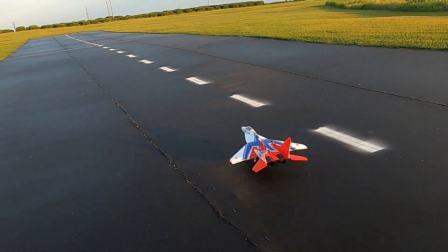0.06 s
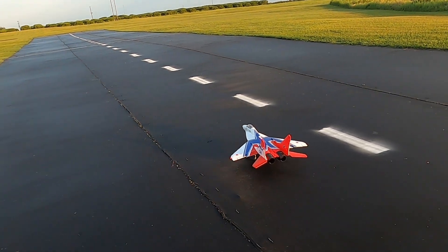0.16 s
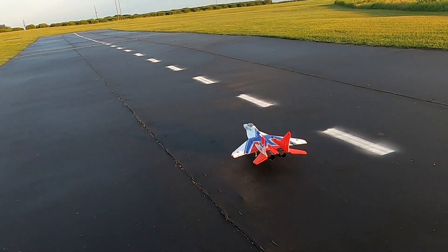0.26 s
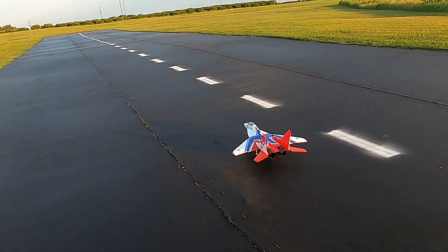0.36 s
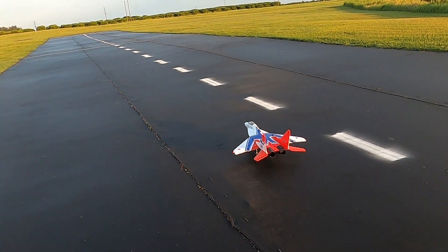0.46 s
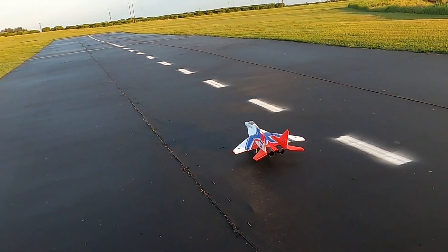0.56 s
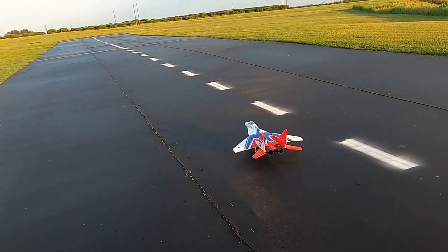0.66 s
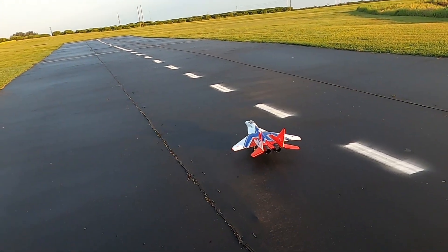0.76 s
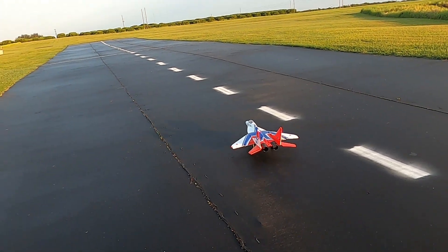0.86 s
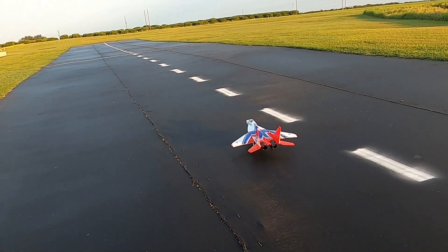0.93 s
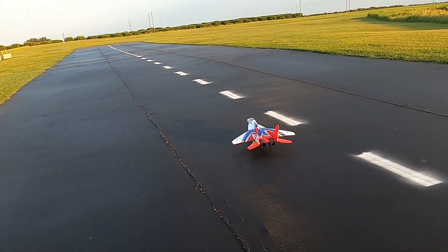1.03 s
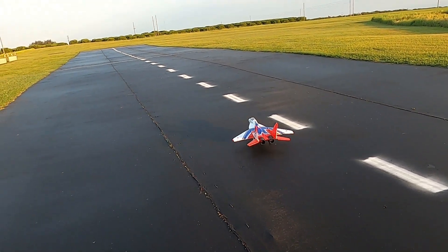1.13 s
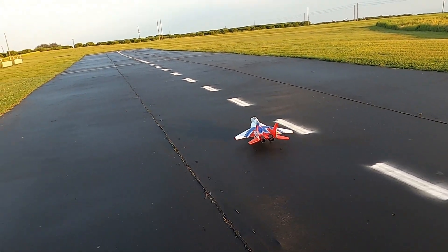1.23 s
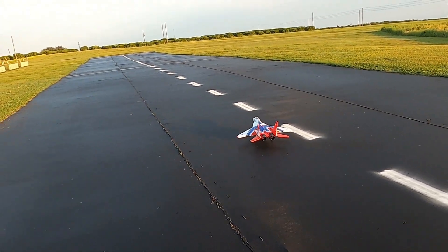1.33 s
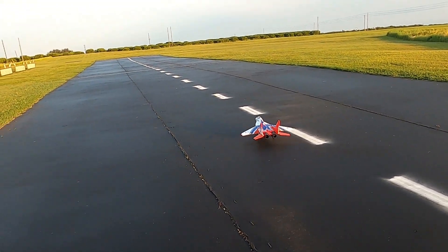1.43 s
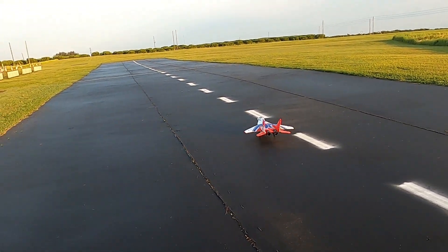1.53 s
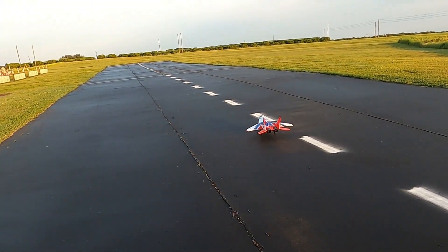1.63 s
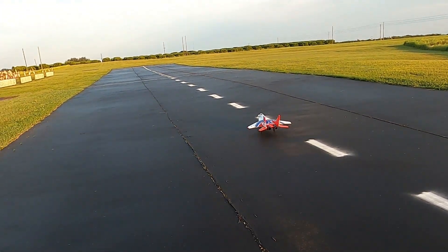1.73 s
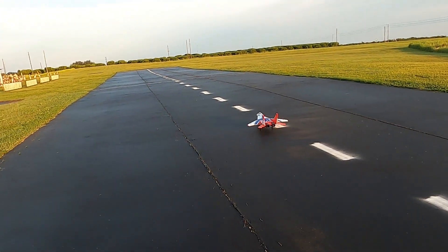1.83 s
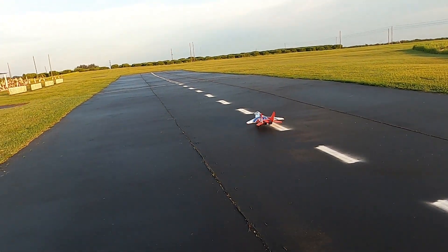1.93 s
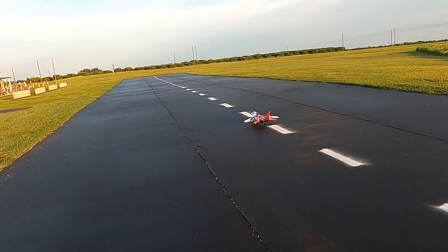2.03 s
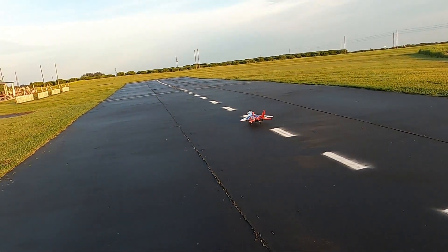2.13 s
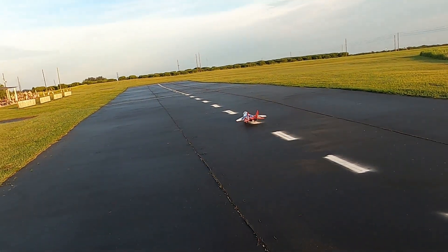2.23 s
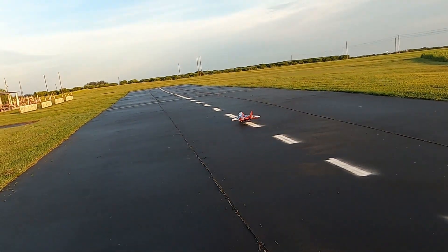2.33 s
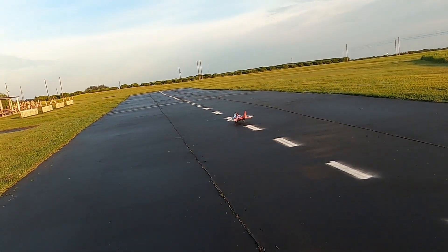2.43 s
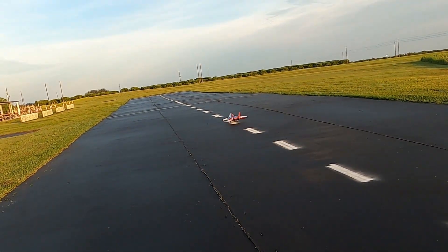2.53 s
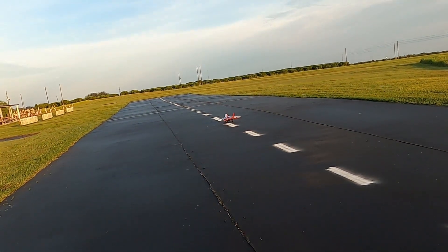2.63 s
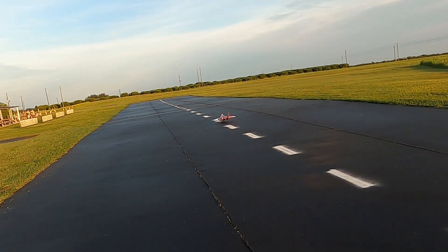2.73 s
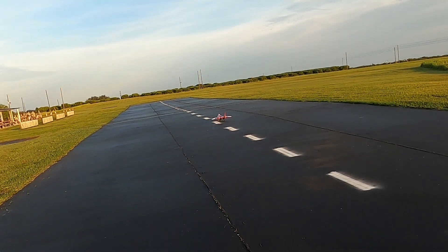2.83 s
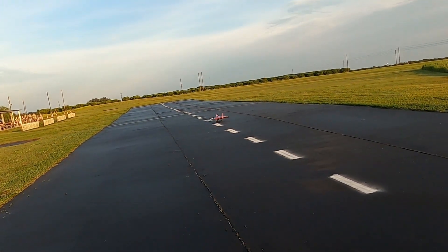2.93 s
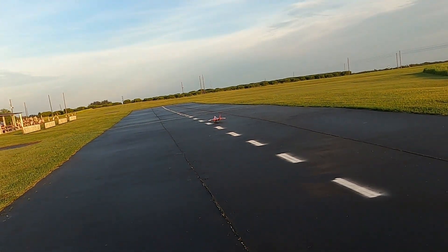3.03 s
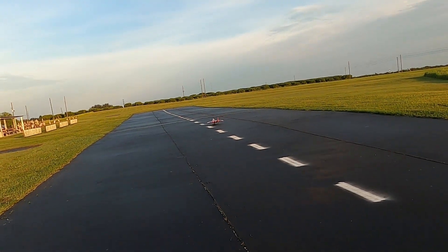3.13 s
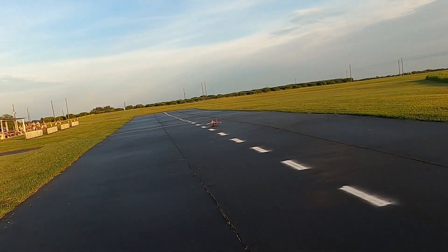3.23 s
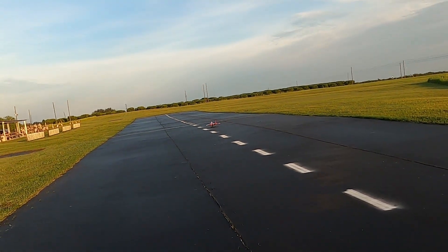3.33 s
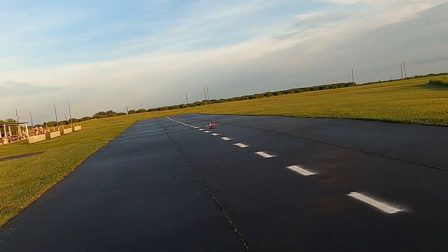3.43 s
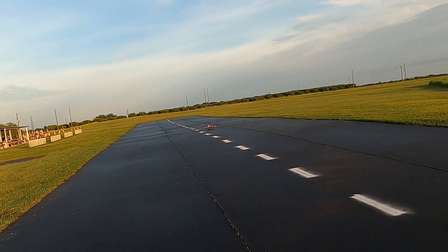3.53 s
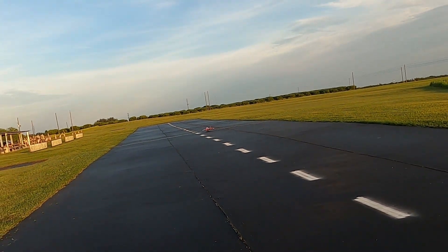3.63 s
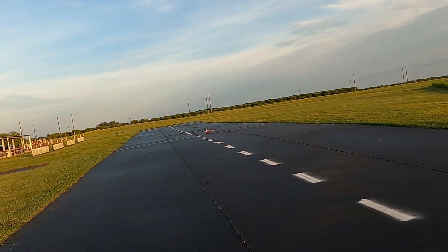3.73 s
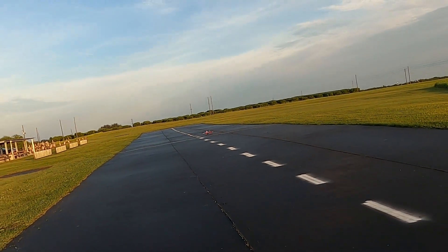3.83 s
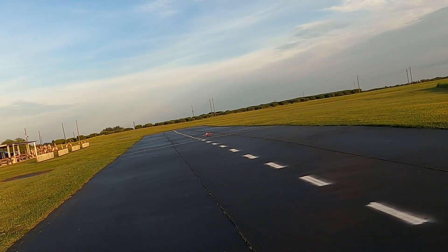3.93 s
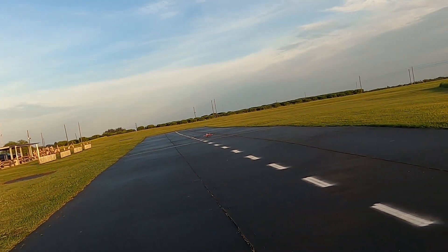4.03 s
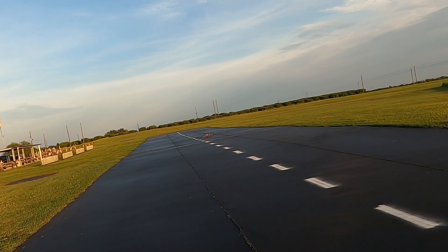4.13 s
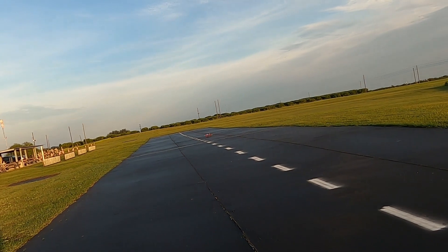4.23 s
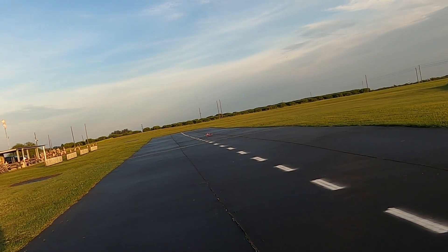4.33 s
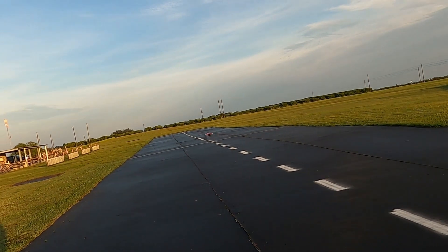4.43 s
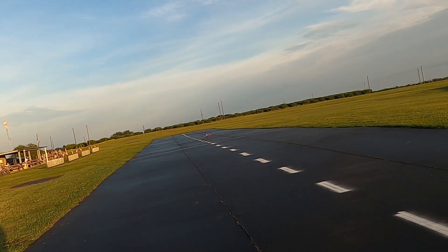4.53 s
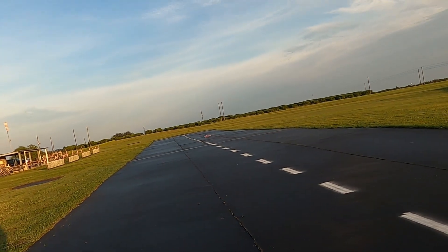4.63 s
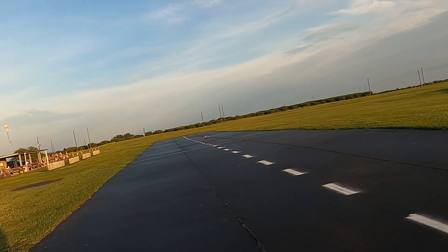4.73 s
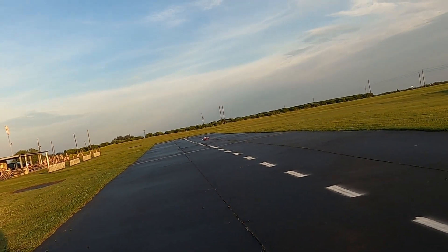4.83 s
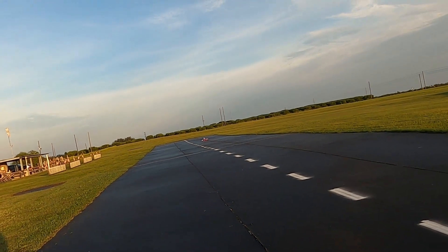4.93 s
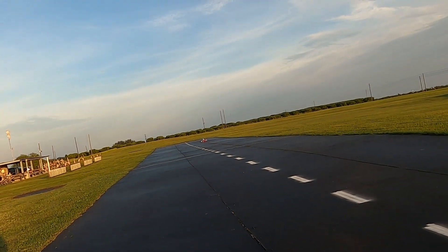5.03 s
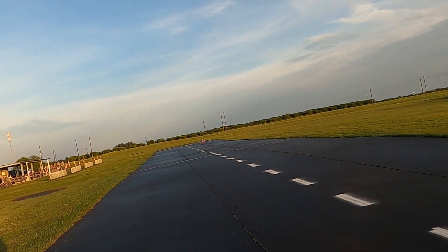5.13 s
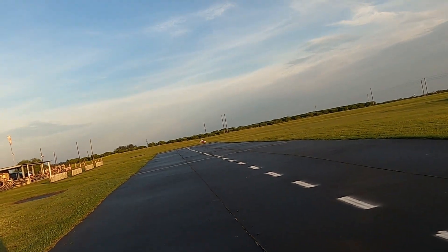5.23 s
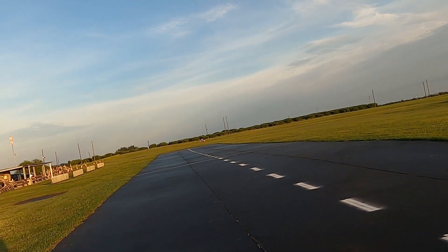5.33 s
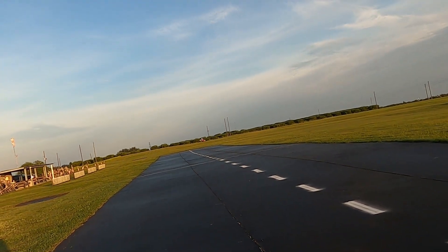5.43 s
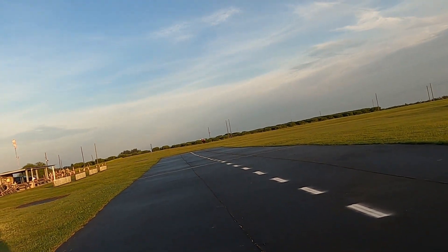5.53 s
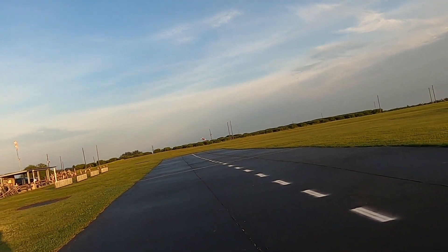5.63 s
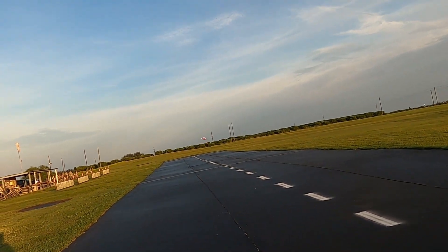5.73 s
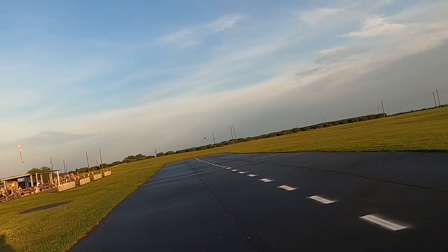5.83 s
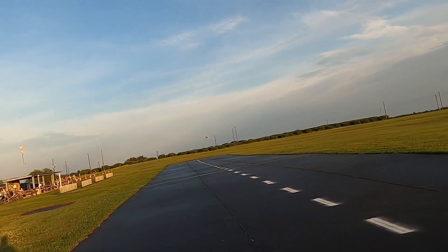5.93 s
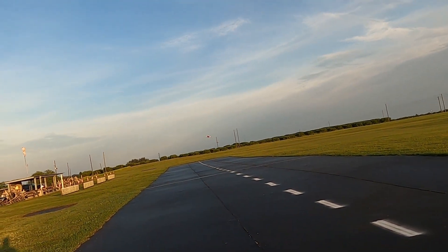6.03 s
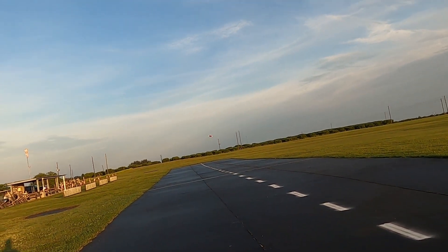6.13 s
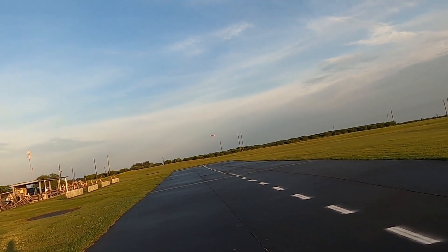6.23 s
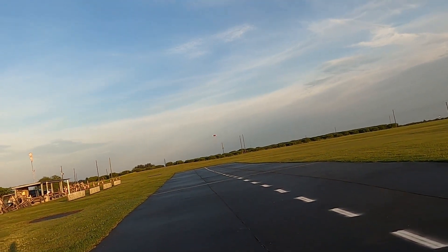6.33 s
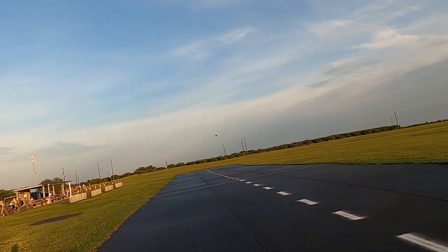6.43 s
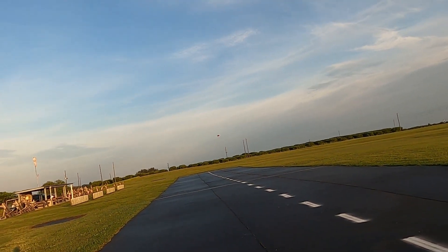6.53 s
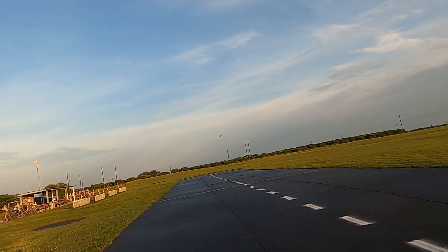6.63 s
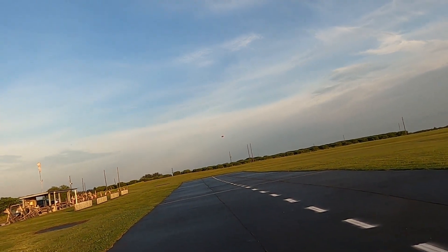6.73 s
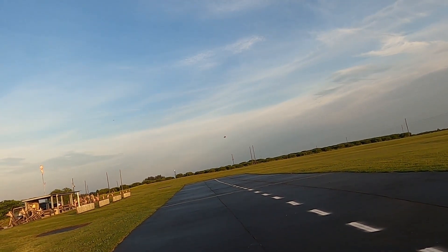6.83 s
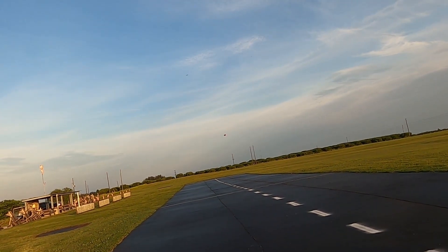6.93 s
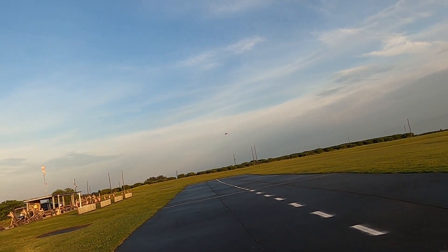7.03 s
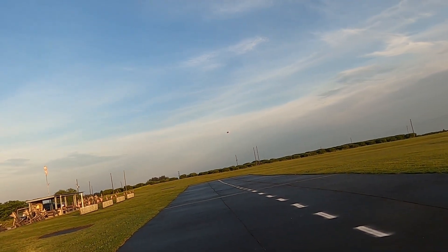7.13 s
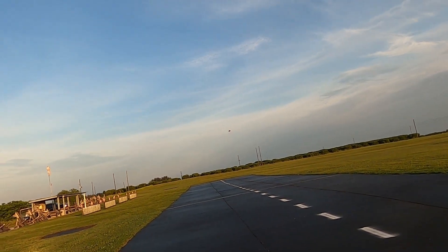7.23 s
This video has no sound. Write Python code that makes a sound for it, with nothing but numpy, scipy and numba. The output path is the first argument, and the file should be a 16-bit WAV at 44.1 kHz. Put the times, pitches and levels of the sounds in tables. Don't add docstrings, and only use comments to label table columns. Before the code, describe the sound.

From the start a model jet's twin electric fans blow loudly nearby on an open runway: a broad, rough exhaust rush with a piercing whine around 4.5 kHz and slight hollow duct howls. The roar dips around 0.4 s, then surges near 0.8 s as the whine climbs in steps, reaching over 8 kHz by 2 s, wavering as the two fans beat. From 2.3 s the jet recedes; treble thins, the whine weakens and the roar drops steadily through 4.5 s. Two very light plastic ticks fall at 3.85 s, and a faint rising bird chirp at 4.7 s. Around 5.2 s the distant whine and airy hiss briefly re-emerge as it lifts off, a phasing comb sliding downward through the fading roar. Soft distant hum and light low wind gusts stay beneath. A sharp, close plastic switch click strikes at 6.94 s, before the faint tail ends at about 7.3 s.

```python
import sys
import numpy as np
from scipy import signal
from scipy.fft import rfft, irfft, next_fast_len
from scipy.io import wavfile
from scipy.ndimage import uniform_filter1d, map_coordinates
from numba import njit

SR = 44100
rng = np.random.default_rng(int(sys.argv[2]) if len(sys.argv) > 2 else 0)


def convert_level_to_amplitude(level_db):
    exponent = np.asarray(level_db, float) / 20
    return 10 ** exponent


def pcm_store(signal):
    levels = np.round(np.clip(np.atleast_2d(signal), -1, 1) * 32767)
    wavfile.write(sys.argv[1], SR, levels.astype(np.int16).T)


N = 321092
T = np.arange(N) / SR
PADDED = next_fast_len(N)
BIN_HZ = np.arange(PADDED // 2 + 1) * SR / PADDED

# (time [s], roar level [dB], clear view of the nozzles [0-1])
JET = [(0, -22.5, 0.84), (.32, -25.5, 0.93), (.48, -26.5, 0.95), (.78, -20, 0.75), (.95, -21.5, 0.92),
       (1.12, -22, 0.89), (1.3, -22, 0.84), (1.5, -22.5, 0.77), (1.66, -22.5, 0.85), (1.8, -22.5, 0.85),
       (2.25, -23.5, 0.77), (2.6, -23.5, 0.38), (3.04, -26, 0.27), (3.15, -26.5, 0.4), (3.2, -27, .12),
       (3.36, -28.5, 0), (3.6, -30, 0.35), (4, -33, 0.22), (4.3, -34, 0.26), (4.5, -33.5, 0),
       (4.8, -36.5, 0.2), (4.88, -36.5, 0.63), (5.12, -37, 0.74), (5.28, -36, 1), (5.42, -36.5, 0.89),
       (5.6, -39, 0.96), (5.95, -41, 0.91), (6.5, -41.5, 0.91), (6.9, -41.5, 0.89), (7.28, -42, 0.87)]
FULL_HZ = 8200
NOZZLE_M, CAMERA_M = .13, 1.7


def curves(table):
    s, *columns = np.transpose(table)
    return [np.interp(T, s, c) for c in columns]


def on_log_hz(table, column=1):
    rows = np.array(table, float)
    return np.interp(np.log(BIN_HZ + 1), np.log(rows[:, 0]), rows[:, column])


def shaped(x, gain):
    return irfft(rfft(x, PADDED) * gain, PADDED)[..., :N]


def above(edge_hz):
    return 1 / (1 + (edge_hz / (BIN_HZ + 1)) ** 8)


def unit(x):
    return x / np.sqrt(np.mean(x ** 2))


def walk(rate):
    k = int(SR / rate)
    steps = np.repeat(rng.standard_normal(N // k + 1), k)
    return unit(uniform_filter1d(uniform_filter1d(steps, k), k)[:N])


def held(events):
    edge_s = 0.056
    return sum(convert_level_to_amplitude(db) * np.clip(np.minimum(T - s, s + length - T) / edge_s, 0, 1)
               for s, length, db in events)


def phase(hz):
    return 2 * np.pi * np.cumsum(hz) / SR


def rippled(x, table, share):
    gain = convert_level_to_amplitude(sum(db / (1 + ((BIN_HZ - hz) / width * 2) ** 2) for hz, width, db in table))
    return x + np.clip(share, 0, 1) * shaped(x, gain - 1)


def echo(x, lag_ms, share, blur_hz, clarity):
    at = np.arange(N) - lag_ms * SR / 1000
    dull = shaped(x, 1 / (1 + (BIN_HZ / blur_hz) ** 2))
    source = dull + clarity * (x - dull)
    return x + share * np.array([map_coordinates(row, [at], order=2) for row in source])


@njit
def band(x, hz, width):
    y, b, l = np.empty(len(x)), 0., 0.
    for i in range(len(x)):
        g, k = np.tan(np.pi * hz[i] / SR), width / hz[i]
        v = (b + g * (x[i] - l)) / (1 + g * (g + k))
        b, l, y[i] = 2 * v - b, l + 2 * g * v, k * v
    return y


def blade_rate():
    # (time [s], blade rate the fans run up to [Hz])
    throttle = [(0, 4690), (.06, 4470), (.21, 4390), (.34, 4355), (.46, 4520), (.5, 4690), (.56, 4850),
                (.6, 5150), (.65, 5380), (.75, 5560), (.85, 5950), (.92, 6300), (.97, 6662), (1.23, 6765),
                (1.49, 7030), (1.63, 7380), (1.68, 7560), (1.745, 7950), (1.8, 8112), (2.06, 8300),
                (2.12, 8485), (5, 8520)]
    stick_s, spool_s = .05, .032
    sag_from_s, recede_hz, recede_s, tire_hz_per_s = 2.3, 300, 1.1, 29
    s, hz = np.transpose(throttle)
    stick = uniform_filter1d(hz[np.searchsorted(s, T, side="right") - 1], int(stick_s * SR))
    keep = np.exp(-1 / (spool_s * SR))
    spooled = hz[0] + signal.lfilter([1 - keep], [1, -keep], stick - hz[0])
    since = np.maximum(T - sag_from_s, 0)
    return spooled - recede_hz * (1 - np.exp(-since / recede_s)) - tire_hz_per_s * since


def flight():
    start_m, push_m_s2, rolling_drag, top_m_s = 5, 20, .3, 28
    lift_s, climb_m_s = 5.37, 9.2
    push = push_m_s2 * np.maximum((blade_rate() / FULL_HZ) ** 2 - rolling_drag, 0)
    speed = np.minimum(np.cumsum(push) / SR, top_m_s)
    metres = start_m + np.cumsum(speed) / SR
    return metres, NOZZLE_M + climb_m_s * np.maximum(T - lift_s, 0)


def exhaust():
    # (frequency [Hz], density [dB per Hz])
    exhaust_colour = [(60, -45), (120, -31), (160, -10.5), (350, 0), (700, -3.5), (1000, 0.5), (1600, 4.5),
                      (2500, 0.5), (4500, -2), (6600, -17.5), (8500, -16), (10500, -16.5), (13500, -22),
                      (15500, -55)]
    # (low edge [Hz], middle edge [Hz], top edge [Hz])
    register_edges = (1677, 3980, 6320)
    # (level when hidden [dB], gain in clear view [dB],
    # how late the gain comes [power], change with fan speed [dB per octave])
    rush_set = (-7.5, 10.5, 3.5, 9.5)
    hiss_set = (-21.5, 15.5, 1.5, -9.5)
    fizz_set = (-21.5, 14, 1.4, 5)
    roar_db, view = curves(JET)
    octaves = np.log2(blade_rate() / FULL_HZ)

    def register_db(hidden_db, clear_db, late, spool_db):
        return hidden_db + np.maximum(view, 0) ** late * clear_db + octaves * spool_db

    air = rng.standard_normal((2, N))
    colour = convert_level_to_amplitude(on_log_hz(exhaust_colour))
    low, mid, top = (above(hz) for hz in register_edges)
    stir = walk(7.9)
    roar = convert_level_to_amplitude(-3.5 + .5 * walk(9)) * unit(shaped(air, colour * (1 - low)))
    rush = convert_level_to_amplitude(register_db(*rush_set) - 3.0 + walk(11)) * unit(shaped(air, colour * (low - mid)))
    hiss = convert_level_to_amplitude(register_db(*hiss_set) - 10.0 + 0.22 * stir) * unit(shaped(air, colour * (mid - top)))
    fizz = convert_level_to_amplitude(register_db(*fizz_set) + 3.5 + .8 * stir) * unit(shaped(air, colour * top))
    return convert_level_to_amplitude(roar_db) * (roar + rush + hiss + fizz)


def fans():
    # (time [s], level [dB])
    whine_levels = [(0, -26), (.07, -26), (.12, -32), (.17, -29), (.2, -37), (.26, -35), (.31, -29),
                    (.38, -29), (.44, -31), (.52, -31), (.59, -26), (.62, -36), (.67, -36), (.73, -28),
                    (.76, -31), (.82, -30), (.88, -31), (.93, -33), (1.0, -30), (1.1, -25), (1.25, -27),
                    (1.4, -30), (1.52, -29), (1.6, -31), (1.66, -42), (1.75, -39), (1.78, -31), (1.83, -33),
                    (1.94, -30), (2.04, -37), (2.16, -30), (2.2, -36), (2.27, -32), (2.4, -36), (2.6, -40),
                    (2.71, -47), (2.75, -40), (3.16, -44), (3.2, -52), (3.6, -53), (4.6, -62), (4.9, -56),
                    (5.12, -50), (5.18, -41), (5.6, -44), (5.9, -48), (6.2, -52), (7.28, -62)]
    # (time [s], level [dB])
    overtone_levels = [(0, -43), (.15, -42), (.4, -41), (.47, -44), (.55, -43), (.68, -40), (.84, -43),
                       (.9, -49), (1, -51), (1.08, -60), (1.2, -80)]
    # (time [s], lead in blade rate [Hz], level [dB])
    twin = [(0, 25, -11), (.86, 40, -8), (.97, -50, -6), (1.62, -85, -6), (1.77, 120, -2), (1.85, -90, -4),
            (2, -110, -3), (2.11, 110, -1), (2.2, 10, -5), (2.4, -30, -6), (7.28, -42, -6)]
    # (time [s], length [s], gain [dB])
    pitch_up = [
        (5.08, 0.91, 24),
        (5.98, 1.4, 19),
    ]
    # (time [s], length [s], level [dB])
    motor = [
        (-.05, .13, -47),
        (.22, .15, -40),
        (.36, .1, -46),
    ]
    # (time [s], length [s], level [dB])
    howls = [
        (-.1, .22, -35),
        (.23, .12, -35),
        (.33, .15, -38),
        (.48, .09, -36),
        (.58, .14, -38),
        (.69, .17, -30.5),
    ]
    shaft_db, blades_per_fan, motor_order = -34, 12, 27
    duct_hz, duct_width_hz = 972, 29.9

    hz, tone_db = blade_rate(), curves(whine_levels)[0]
    lead_hz, twin_db = curves(twin)
    overtone_db = curves(overtone_levels)[0]
    shaft = convert_level_to_amplitude(curves(JET)[0] + shaft_db) * (1 + held(pitch_up))
    out = 0
    for rate, db in ((hz, 0), (hz + lead_hz, twin_db)):
        turn = phase(rate * (1 + 0.00071 * walk(30)))
        blades = convert_level_to_amplitude(tone_db) * np.sin(turn) + convert_level_to_amplitude(overtone_db) * np.sin(2 * turn)
        out = out + convert_level_to_amplitude(db + 1.5 * walk(30)) * blades
        out = out + convert_level_to_amplitude(db + 1.5 * walk(6)) * shaft * np.sin(turn / blades_per_fan)
    out = out + held(motor) * np.sin(phase(hz) * motor_order / blades_per_fan)
    howl = np.sin(phase(duct_hz + duct_width_hz * walk(28.84) / 2))
    return out + held(howls) * convert_level_to_amplitude(6 + 1.5 * walk(40)) * howl


def air_loss(jet, metres):
    loss_db = np.minimum(1.24 * metres, 39)
    return jet - (1 - convert_level_to_amplitude(-loss_db)) * shaped(jet, above(9460))


def pavement_echo(jet, metres, height):
    pavement = [(5, 0.81), (10, 1), (15, 0.67), (25, 0.24), (68, 0.35), (85, 0.4), (97, 0.12), (104, 0.3),
                (112, 0.53), (120, 0.38), (130, 0.32), (145, 0)]
    airborne_clarity, clear_above_m, surface_ms = .35, 2, .07
    lag_ms = surface_ms + 1000 * 2 * height * CAMERA_M / metres / 343
    share = np.clip(np.interp(metres, *np.transpose(pavement)), 0, 1)
    airborne = np.minimum(height / clear_above_m, 1)
    bass_echo = echo(jet, lag_ms, .35 * airborne, 2200, 0) - jet
    return echo(jet, lag_ms, share, 3250, np.clip(airborne_clarity * airborne, 0, 1)) + bass_echo


def body_echo(jet, metres, height):
    dip, dip_width_hz, dip_gone_m = .75, 170.0, 25
    lag_ms = 1.23 - .85 * CAMERA_M / metres
    jet = echo(jet, lag_ms, 0.17, 5200, 0)
    depth = dip * np.clip(1 - height / dip_gone_m, 0, 1)
    return jet - depth * np.array([band(row, 1500 / lag_ms, dip_width_hz) for row in jet])


def passing_colours(jet, height):
    # (frequency [Hz], width [Hz], gain [dB])
    idle_duct = [(1100, 99, -7.5), (2500, 210, 4.5), (1420, 160, -1), (3480, 130, 7.5), (7700, 1100, -5),
                 (9700, 800, 3.5)]
    # (time [s], length [s], share [dB])
    yaw = [
        (2.28, 0.545, 0),
    ]
    # (frequency [Hz], width [Hz], gain [dB])
    yaw_colour = [(580, 190, -2.5), (1620, 250, 3.5), (2400, 480, 3.5)]
    # (time [s], length [s], share [dB])
    clear_air = [
        (2.55, .66, 4),
        (3.28, .4, -6),
        (4.82, 0.3, 4),
        (5.45, .7, 1),
    ]
    # (frequency [Hz], width [Hz], gain [dB])
    clear_colour = [(12000, 4600, 4.8)]
    # (frequency [Hz], width [Hz], gain [dB])
    climb_colour = [(440, 210, -4.5), (650, 260, 0.5), (1450, 200, 3.5)]
    jet = rippled(jet, idle_duct, (6000 - blade_rate()) / 400)
    jet = rippled(jet, yaw_colour, held(yaw))
    jet = rippled(jet, clear_colour, held(clear_air))
    return rippled(jet, climb_colour, (height - NOZZLE_M) / 8.2)


def near_far_colour(jet, metres):
    # (frequency [Hz], width [Hz], gain [dB])
    near_colour = [(1670, 110, 4.5), (4170, 360, -1), (4700, 170, 6), (5630, 1500, 3)]
    far_colour = [(570, 76, -1), (713, 100, 5), (1030, 100, 5), (1280, 170, -0.5), (1510, 140, 0.5),
                  (1960, 340, -3), (2250, 140, 3.5), (2750, 190, -1.5), (3090, 260, 2.5), (3730, 280, -3.5),
                  (3940, 130, 3.5), (4710, 110, 5), (9000, 480, 4.5)]
    near_m, far_m = 6.3, 12.3
    far = (metres - near_m) / (far_m - near_m)
    return rippled(rippled(jet, near_colour, 1 - far), far_colour, far)


def left_port(direct, scattered, tones):
    # (frequency [Hz], level [dB], phase [rad], likeness [0-1])
    ports = [(100, 0.5, -0.2, 0.94), (1000, -0.8, -0.7, 0.98), (1600, 0, -0.4, 0.95),
             (3000, 1.9, -0.95, 0.91), (4500, 1.9, -1.45, 0.85), (5200, 3, -2.2, 0.8),
             (5900, 0.5, -3.1, 0.9), (6600, -4, -4.8, 0.5), (7000, 1.5, -7, 0.7), (7700, 3.2, -8.0, 0.82),
             (8100, -0.5, -8.8, 0.88), (9000, -9, -8.9, 0.62), (10000, -6, -8.5, 0.5),
             (11000, -7, -9.5, .25), (12000, -2.5, -12.5, .55), (14000, -1.2, -12.6, 0.35)]
    # (frequency [Hz], level [dB], phase [rad])
    housing = [(4500, 0, -.1), (5100, -1, -.5), (5600, -5, 0), (5900, -2, .3), (6250, -2, .3),
               (6650, -10, 0), (7200, 0, -.6), (7700, -1, -.65), (8500, -1, -.6), (10000, -5, -.4),
               (11600, -26, 0), (12300, -16, -1), (13300, -8, -2.2), (14500, -12, -2.2)]
    # (time [s], housing shade [0-1])
    aim = [(0, 1), (2.1, 1), (2.5, .45), (3.3, .15), (4.5, 0), (5.4, .15), (7.28, .1)]
    like = np.clip(on_log_hz(ports, column=3), 0, 1)
    port = convert_level_to_amplitude(on_log_hz(ports)) * np.exp(1j * on_log_hz(ports, column=2))
    left = shaped(direct, port * like) + shaped(scattered, port * np.sqrt(1 - like ** 2))
    left = left + shaped(tones, port)
    through = convert_level_to_amplitude(on_log_hz(housing)) * np.exp(1j * on_log_hz(housing, column=2))
    return left - np.clip(curves(aim)[0], 0, 1) * shaped(left, 1 - through)


def stereo_noise(colour):
    return unit(shaped(rng.standard_normal((2, N)), convert_level_to_amplitude(on_log_hz(colour))))


def field():
    # (frequency [Hz], density [dB per Hz])
    distant_colour = [(60, -16.5), (130, -13.5), (150, -6.5), (160, 5.5), (172, -14), (200, -3.5),
                      (300, -14), (600, -45), (2000, -9.5), (8000, -44)]
    # (frequency [Hz], density [dB per Hz])
    rumble_colour = [(15, -12), (30, -31), (60, 3.5), (100, 5), (140, 5.5), (300, -44)]
    # (time [s], level [dB], half width [s])
    gusts = [(.14, -55, 0.16), (.62, -49.5, 0.19), (.97, -51, 0.059), (1.171, -57, 0.22), (1.56, -64, 0.11),
             (2.04, -53.5, 0.17), (2.33, -53, 0.1), (2.65, -57, 0.21), (3.06, -61, 0.045),
             (3.33, -60, 0.11), (3.75, -66, 0.18), (4.18, -70, 0.095), (4.4, -72, 0.04), (4.8, -76, 0.42),
             (5.76, -61, 0.048), (6.45, -58.5, 0.15), (6.81, -59, .07), (7.22, -74, 0.046)]
    apart = np.array([[1], [-1]])
    mid, side = stereo_noise(distant_colour)
    distant = convert_level_to_amplitude(-50.5 + 1.9 * walk(3.95)) * (mid + 0.19 * side * apart)
    hum = convert_level_to_amplitude(-64.5 + 1.2 * walk(4.4)) * np.sin(phase(164.5 + 2.45 * walk(9.7)))
    mid, side = stereo_noise(rumble_colour)
    strength = convert_level_to_amplitude(-78) + sum(convert_level_to_amplitude(db) / (1 + ((T - s) / half) ** 4) for s, db, half in gusts)
    wind = strength * convert_level_to_amplitude(0.52 * walk(6.1)) * (mid + .5 * side * apart)
    return distant + hum + wind


def switch():
    # (time [s], peak level [dB], bright share [0-1])
    clicks = [
        (6.9368, -14.5, 0.66),
        (3.835, -26, 0.95),
        (3.856, -35, .97),
    ]
    # (frequency [Hz], level [dB], time to fade by 60 dB [s])
    modes = [(677, -4, 0.06), (940, 1, 0.027), (1310, 1.5, 0.031), (1860, 3, .02), (2385, 8, 0.013),
             (2690, -3, 0.023), (3480, 8.5, 0.0084), (4220, 2.5, 0.0075), (4570, -4, .008),
             (9200, -12, 0.0071)]
    # (time after the strike [s], level [dB])
    rebounds = [
        (.0034, -23),
        (.006, -16),
    ]
    out, t = np.zeros(N), np.arange(SR // 20) / SR
    for s, db, bright in clicks:
        ring = 0
        for hz, g, t60 in modes:
            share = bright if hz > 4000 else 1 - bright
            ring = ring + convert_level_to_amplitude(g) * share * np.sin(2 * np.pi * hz * t) * 1000. ** (-t / t60)
        ring = ring * np.minimum(t / 0.00038, 1)
        ring = ring + sum(convert_level_to_amplitude(g) * np.roll(ring, int(late * SR)) * (t > late) for late, g in rebounds)
        out[int(s * SR):][:len(t)] += convert_level_to_amplitude(db) * ring / abs(ring).max()
    return shaped(out, above(300))


def bird():
    # (time [s], length [s], from [Hz], to [Hz], level [dB])
    chirps = [
        (4.692, .032, 5470, 6350, -55),
    ]
    out = 0
    for s, length, from_hz, to_hz, db in chirps:
        part = np.clip((T - s) / length, 0, 1)
        swell = 4 * np.sin(np.pi * part) * (1 - part) / 2
        out = out + convert_level_to_amplitude(db) * swell * np.sin(phase(from_hz + (to_hz - from_hz) * part))
    return out


def scene():
    metres, height = flight()
    jet = air_loss(exhaust(), metres)
    jet = pavement_echo(jet, metres, height)
    jet = body_echo(jet, metres, height)
    jet = passing_colours(jet, height)
    direct, scattered = near_far_colour(jet, metres)
    tones = fans() + switch() + bird()
    left = left_port(direct, scattered, tones)
    return np.array([left, direct + tones]) + field()


def top_cut(x):
    return signal.sosfilt(signal.butter(12, 15540, fs=SR, output="sos"), x)


def record(dry):
    return top_cut(dry)


dry = scene()
out = record(dry)
pcm_store(out)
```